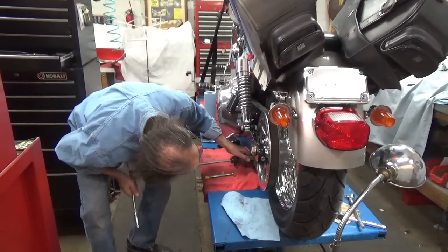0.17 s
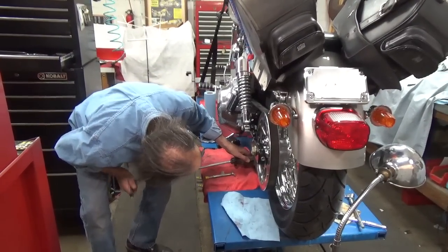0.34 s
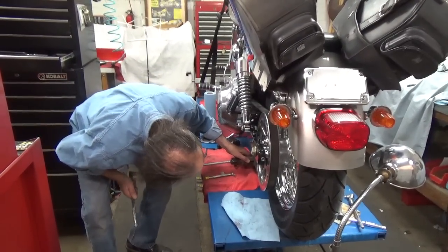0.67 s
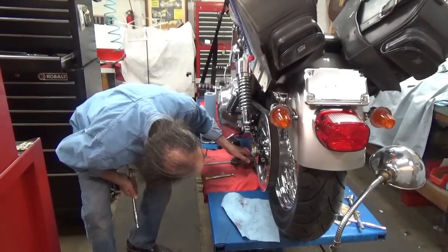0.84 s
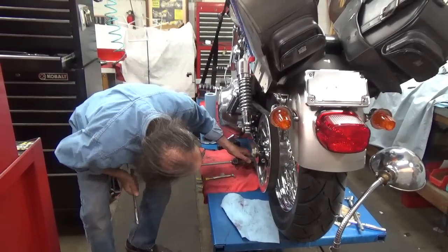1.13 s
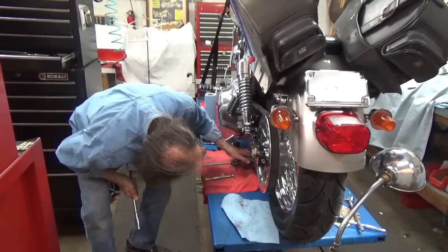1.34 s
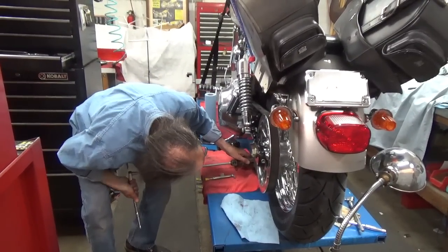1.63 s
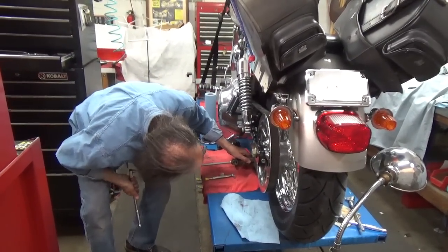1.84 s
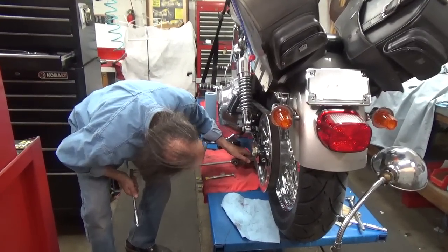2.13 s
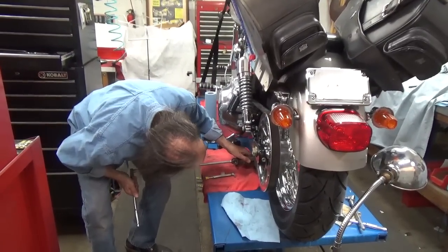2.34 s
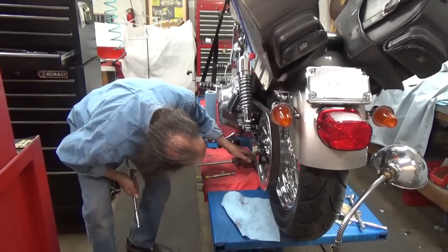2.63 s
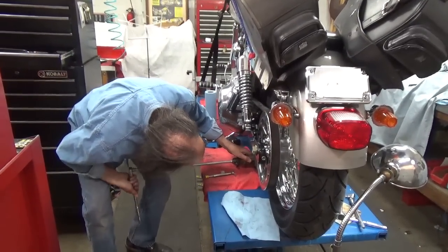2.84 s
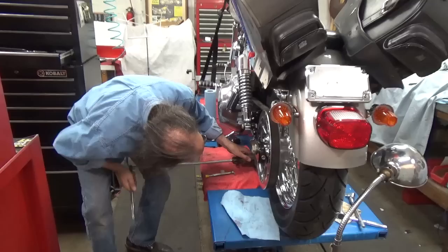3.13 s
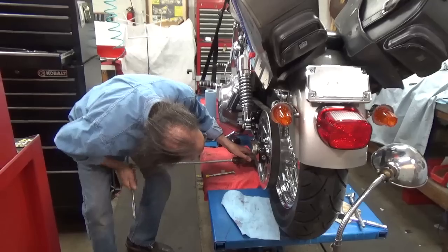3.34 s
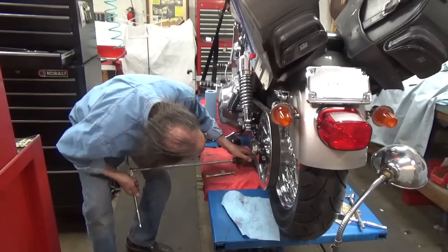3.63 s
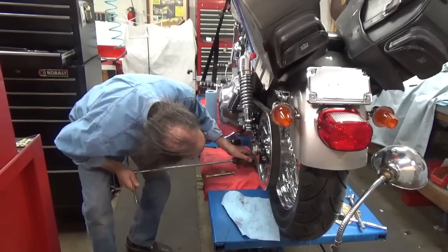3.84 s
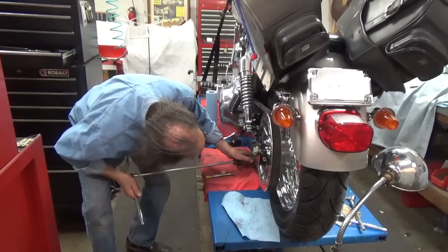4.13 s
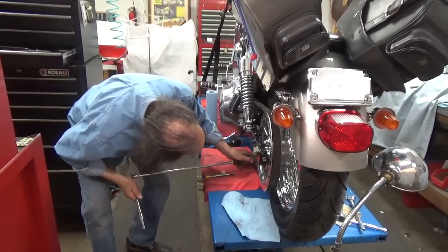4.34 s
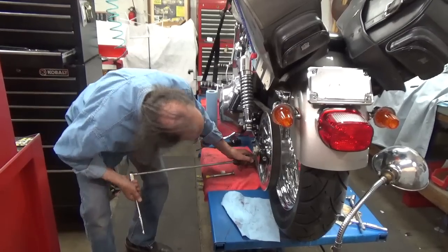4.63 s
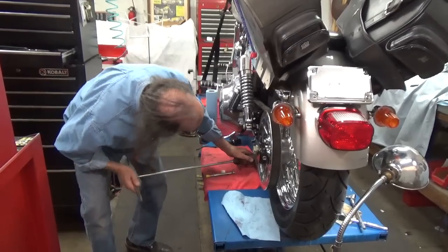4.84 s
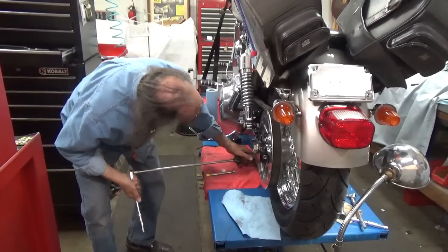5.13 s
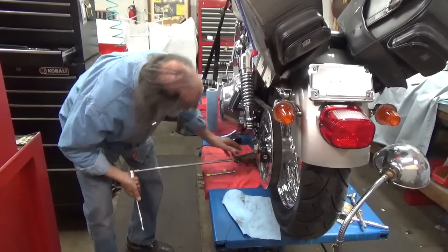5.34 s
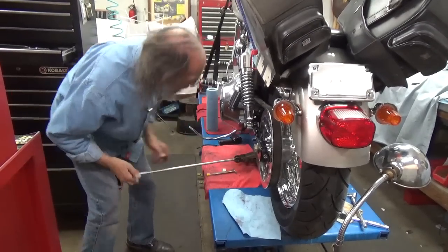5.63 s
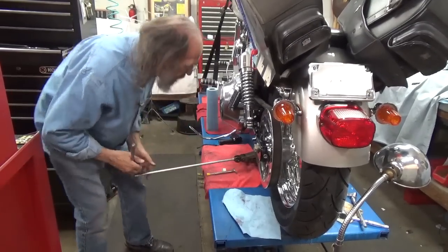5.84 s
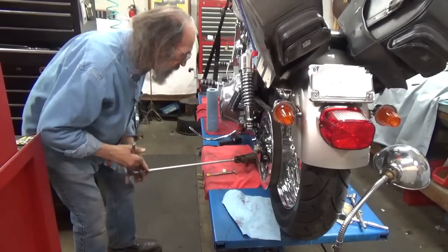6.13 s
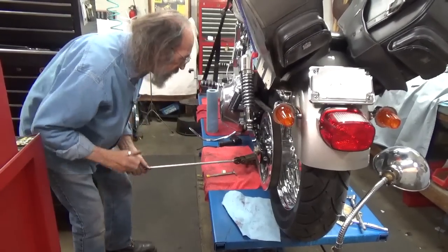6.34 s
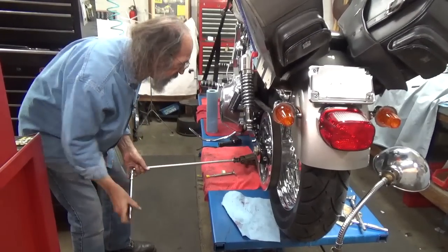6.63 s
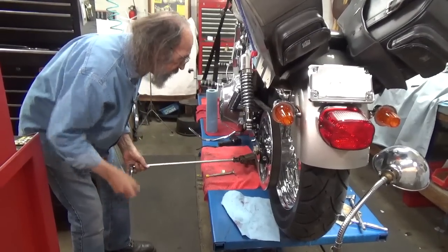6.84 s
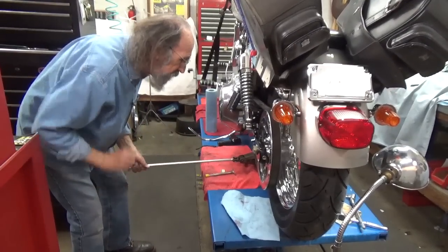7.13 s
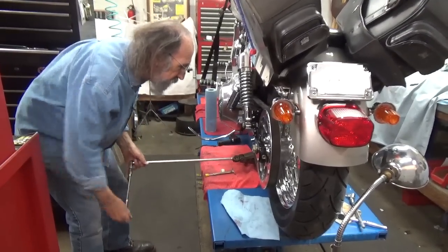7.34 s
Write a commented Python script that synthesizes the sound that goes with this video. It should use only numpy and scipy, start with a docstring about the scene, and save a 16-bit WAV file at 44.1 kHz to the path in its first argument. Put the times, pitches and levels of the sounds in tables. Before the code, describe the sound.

Quick runs of crisp metallic ratchet clicks, separated by small socket taps, cloth rustle and soft thuds through a bike frame in a small garage.

```python
"""A small garage, close to the rear wheel of a motorcycle on its lift, one camera microphone in mono.
A ratchet wrench on a long steel extension swings back, its pawl snapping over a few teeth as noise bursts
and decaying modes. The loose socket taps and grates through resonances; knocks ring lift, frame and panels.
Shaped noise makes the rubbing sleeves and hands, the quiet air and the short reverberation; sines add
a low hum and a thin tone."""
import sys
import numpy as np
from scipy import signal
from scipy.fft import rfft, irfft
from scipy.io import wavfile
from scipy.ndimage import uniform_filter1d

SR = 44100
rng = np.random.default_rng(int(sys.argv[2]) if len(sys.argv) > 2 else 0)


def store_pcm(level_fs):
    """Save levels as 16-bit WAV."""
    pcm = np.round(np.clip(level_fs, -1, 1) * 32767).astype(np.int16)
    wavfile.write(sys.argv[1], SR, np.atleast_2d(pcm).T)


N = 329868

# quiet garage air, spectrum: (frequency [Hz], relative density [dB])
AIR_SPECTRUM = [(15, -60), (25, -20.5), (59, 4.5), (165, -7.5), (197, -4.5), (223, -13), (362, -27.5),
                (907, -22), (979, -30), (1300, -25), (2160, -27.5), (9930, -29.5), (11000, -36),
                (14300, -70), (22000, -120)]
# low hum, peak before it wavers: (frequency [Hz], level [dB])
HUM_TONES = [(60, -77), (119, -79.5), (196, -74)]
# sleeves and hands rubbing: (time of full strength [s], length [s], level [dB])
RUBS = [(0.017, .2, -70), (1.073, 0.023, -48.5), (1.395, .04, -65), (1.903, .03, -55.5),
        (2.793, 0.025, -58), (3.004, .5, -60.5), (4.527, 0.51, -56.5), (5.571, 0.19, -38.5),
        (6.118, 0.042, -44), (6.24, 0.035, -49.5), (6.59, 0.098, -54), (6.942, .1, -38.5),
        (7.356, 0.071, -58)]
# rubbing cloth and skin, spectrum: (frequency [Hz], relative density [dB])
CLOTH_SPECTRUM = [(120, -32.5), (200, -9), (385, 0), (625, -8), (692, -7), (920, -10), (1000, -7.5),
                  (1800, -16.5), (2020, -16), (4920, -18.5), (11000, -23.5), (14300, -53.5), (22000, -120)]
# tool resonances stirred by grating and rubbing; rubbing leaves the gain aside:
# (frequency [Hz], width [Hz], gain [dB])
GRATE_RESONANCES = [(1650, 400, 7), (2500, 500, -2), (3270, 520, 2), (3460, 100, -14), (4700, 1000, -16),
                    (8400, 780, -18)]
# blows that reach bike and lift: (time [s], push time constant [s], thud level [dB], frame ring level [dB])
KNOCKS = [(0.005, 0.015, -53.5, -61), (0.29, 0.021, -49, -49.5), (0.497, 0.0039, -54, -53.5),
          (1.0848, 0.0011, -32.5, -28.5), (1.386, 0.0045, -38, -46), (1.945, 0.0038, -41.5, -37.5),
          (2.108, .012, -46, -48), (2.485, .016, -56.5, -63.5), (2.753, .017, -52, -62),
          (2.979, 0.0026, -66, -69), (3.233, 0.029, -40.5, -45.5), (3.351, .008, -36, -38),
          (3.989, 0.0091, -54, -67.5), (4.865, 0.011, -52.5, -46.5), (5.042, 0.0017, -47.5, -40.5),
          (5.44, 0.026, -54.5, -57.5), (5.788, 0.0037, -57, -43), (6.05, 0.0094, -61, -54.5),
          (6.375, 0.00095, -54, -50), (6.602, .0015, -46, -35), (7.183, 0.0023, -43, -31)]
# lift platform: (frequency [Hz], relative level [dB], t60 [s])
LIFT_MODES = [(61, -11, 0.38), (115.5, -1, 0.33), (154, -4.5, .3), (198.2, -1.5, 0.41), (233.3, -6.5, .28),
              (271, -4.5, 0.18)]
# thud of the lift, spectrum: (frequency [Hz], relative density [dB])
THUD_SPECTRUM = [(20, -34.5), (45, -15), (60, -8), (85, -7.5), (118, 0), (155, -6.5), (197, -3.5),
                 (260, -6), (340, -8), (600, -46)]
# bike frame: (frequency [Hz], relative level [dB], t60 [s])
FRAME_MODES = [(278.5, -7, 0.18), (309, -4.5, 0.27), (349.3, -4.5, 0.16), (361, -2.5, 0.21),
               (387, -1.5, 0.17), (490, -13.5, .22)]
# lift deck and panels: (frequency [Hz], relative level [dB], t60 [s])
PANEL_MODES = [(502, -8, 0.26), (680, -4.5, 0.28), (787, 1, 0.14), (1060, -14, .15), (1153, -9.5, 0.31),
               (1250, -8.5, 0.14), (1580, -14, 0.16), (2000, -14, 0.18)]
# clack of the panels, spectrum: (frequency [Hz], relative density [dB])
CLACK_SPECTRUM = [(250, -17.5), (420, -2), (510, -4), (620, -1), (790, -3), (1000, -8), (1250, -10),
                  (1900, -13), (3500, -33.5), (10000, -42)]
# back-swings of the handle, before each tooth's scatter: (first tooth [s], last tooth [s], teeth passed [count],
# first gap over middle gap [ratio], last gap over middle gap [ratio], snap level at mid-swing [dB],
# snap change over the swing [dB], snap pitch at mid-swing [Hz], shank ring level before SHANK_LIFT_DB [dB],
# shank pitch [Hz], frame ring level [dB])
SWINGS = [(0.1861, 0.3075, 5, .95, 1.07, -19.3, -1.5, 7800, -31.5, 4570, -58),
          (1.132, 1.1317, 1, 1, 1, -15.5, 0, 10630, -30, 4700, -54),
          (1.9394, 1.9852, 2, 1, 1, -17.7, -1, 9100, -30.5, 3695, -48),
          (3.1121, 3.2484, 8, 1.6, 1.43, -17.7, 1.5, 8840, -29.8, 3300, -60),
          (3.7073, 3.8487, 6, 1.69, 1.2, -19.3, 1.5, 6817, -30, 3520, -63),
          (4.7562, 4.8922, 6, .95, 1.37, -21.7, -8, 8400, -25.5, 2030, -53),
          (5.5207, 5.7748, 10, 1.45, 1.25, -23.4, 0.5, 7900, -30, 4315, -42.5),
          (6.8875, 7.0272, 5, 1.47, 1.12, -19.2, 2, 7250, -29.5, 4680, -42),
          (7.0977, 7.0977, 1, 1, 1, -21.5, 0, 8630, -28, 3393, -41.5)]
# pawl snapping down, spectrum: (frequency [Hz], relative density [dB])
SNAP_SPECTRUM = [(300, -13), (1200, -15.5), (3000, -13.5), (4500, -8.5), (6000, -2), (7500, -3.5),
                 (9000, -1.5), (11000, -7.5)]
# ringing shank and rattling parts, spectrum: (frequency [Hz], relative density [dB])
SHANK_SPECTRUM = [(300, -19.5), (1100, -14), (1600, -4.5), (2200, 1.5), (3400, -9), (4500, -4.5),
                  (7000, -5), (11000, -10)]
# steel extension held in the hand: (frequency [Hz], relative level [dB], t60 [s])
ROD_MODES = [(1437, -9, 0.053), (1680, -4, 0.042), (1974, -9, 0.08), (2840, -4.5, 0.027), (3290, -1, .03),
             (3620, 2.5, 0.041), (4250, -3.5, 0.013)]
# socket grating on the nut: (time [s], length [s], level [dB])
SCRAPES = [(.46, 0.05, -58.5), (0.59, 0.0084, -61), (1.019, 0.034, -58.5), (1.048, 0.066, -48),
           (1.08, 0.012, -29), (1.333, 0.026, -53), (1.827, 0.015, -63.5), (1.869, 0.12, -57),
           (2.767, 0.073, -53), (2.848, .03, -56.5), (2.953, .015, -60), (2.981, 0.017, -54),
           (6.371, .022, -50), (6.564, 0.011, -53.5)]
# socket and handle tapping in their play, level before the ping is added: (time [s], level [dB], pitch [Hz])
TAPS = [(0.4865, -55.5, 1510), (0.5036, -30, 5574), (1.1635, -32.5, 1633), (2.772, -49.5, 1732),
        (2.8106, -49.5, 1706), (3.3163, -36, 5885), (3.352, -37, 9180), (3.3626, -24.5, 2917),
        (3.4117, -42, 6630), (3.608, -51, 2710), (3.9343, -51, 2540), (4.368, -61, 2636),
        (4.9971, -45.5, 3480), (5.0291, -52, 3450), (5.044, -31.5, 5700), (5.047, -25.5, 2883),
        (5.1624, -59, 4170), (6.3806, -44.5, 10010), (6.8192, -50.5, 5340), (7.1798, -37.5, 5980),
        (7.1846, -25, 8370), (7.2524, -51.5, 6840)]
# loose socket: (frequency [Hz], width [Hz], gain [dB])
SOCKET_RESONANCES = [(1897, 900, -9.5), (3120, 630, 2), (5620, 250, 9), (7950, 3000, 6.5),
                     (9900, 850, -14.5)]
# sound leaving the tool in all directions, spectrum: (frequency [Hz], relative density [dB])
RADIATED_SPECTRUM = [(100, -21), (500, -1), (1100, -8), (1700, 1.5), (2600, -2), (3500, 0), (4800, -4),
                     (7500, 0), (11000, 3)]
# garage reverberation: (frequency [Hz], t60 [s])
ROOM_T60 = [(100, 0.99), (500, 0.29), (2000, .3), (6000, .25), (11000, 0.14)]

HIT = np.arange(SR // 2) / SR  # time since a blow, s
STRIKE_S = .012  # stretch over which steel sounds are levelled
AIR_DB = -67  # rms before its slow drift
THIN_HZ, THIN_DB, THIN_FULL_S, THIN_HOLD_S = 1440, -81, 1.7, 1.1  # a thin tone that comes and goes once
# a rub swells and dies away (each the time for 60 dB); the clothes never quite rest
RUB_ATTACK_S, RUB_T60_S, RUB_REST_DB = 0.29, .42, -73
# a longer push is softer on the panels: clack change for each doubling relative to a sharp blow
SHARP_PUSH_S, CLACK_DB_PER_DOUBLING = 0.0017, -3.0
# from SHIFT_S on, blows favour a higher frame mode and spare the panels
SHIFT_S = 3.3
EARLY_RING_HZ, EARLY_CLACK_DB = 303, 2.9  # clack against the mean of thud and frame ring
LATE_RING_HZ, LATE_CLACK_DB = 361, -4.5
TOOTH_PUSH_S, TOOTH_THUD_DB = 0.003, -15.5  # each tooth also jolts the bike; thud against the frame ring
# no two teeth are alike: spread of level, and of pitch (share)
TOOTH_SCATTER_DB, SNAP_SCATTER, SHANK_SCATTER = .5, 0.056, .04
# the snap sinks in pitch over a swing (share); the last tooth of a run of three or more is only just cleared
SNAP_SAG, LAST_TOOTH_DB = .12, -1.5
SHANK_LIFT_DB = 3.0  # lift of shank and extension together
# from LET_GO_S no hand steadies the extension: its low modes ring more and it clatters in the socket
LET_GO_S, FREE_ROD_DB, FREE_ROD_HZ, FREE_CLATTER_DB = 5.4, 7.5, 1450, -39.5
# harder and higher taps are brighter: treble of a middling tap and how it grows
TAP_TREBLE_DB, TAP_MID_DB, TAP_MID_HZ = -1.5, -42, 5500
TREBLE_DB_PER_OCTAVE, TREBLE_DB_PER_DB = 3, 0.22
TOP_HZ = 11000  # upper limit of the microphone track


def undb(db):
    """Decibels to gain."""
    return 10 ** (np.asarray(db) / 20)


def add(track, s, sound):
    """Mix a sound in from time s."""
    i = max(0, int(s * SR))
    track[i:i + len(sound)] += sound[:max(0, N - i)]


def level(x, db, span):
    """Scale a sound so that its first span seconds have the given rms."""
    return x * undb(db) / np.sqrt(np.mean(x[:int(span * SR)] ** 2) + 1e-20)


def freqs(x):
    """Frequency of each bin of a sound's spectrum, at least 1 Hz."""
    return np.maximum(np.arange(len(x) // 2 + 1) * SR / len(x), 1)


def along(points, hz):
    """Read (frequency, value) points on a log-frequency axis."""
    f, value = np.transpose(points)
    return np.interp(np.log(hz), np.log(f), value)


def colour(x, points, size=4096):
    """Minimum-phase filter with the given spectrum, so nothing sounds ahead of its blow."""
    cepstrum = irfft(np.log(undb(along(points, freqs(np.empty(size))))))
    # fold the cepstrum onto positive time
    cepstrum[1:size // 2] *= 2
    cepstrum[size // 2 + 1:] = 0
    impulse = irfft(np.exp(rfft(cepstrum)))
    return signal.fftconvolve(x, impulse)[:len(x)]


def resonate(x, hz, width_hz):
    """One resonance, gain 1 at its centre."""
    return signal.lfilter(*signal.iirpeak(hz, hz / width_hz, fs=SR), x)


def fade(t60):
    """Exponential decay over the length of a blow."""
    return np.exp(-np.log(1000) * HIT / t60)


def burst(t60):
    """Dense vibration dying away, as decaying noise."""
    return rng.standard_normal(len(HIT)) * fade(t60)


def chatter(t60, spike_db):
    """A run of tiny collisions of very unequal size, dying away."""
    sizes = np.repeat(rng.standard_normal(len(HIT) // 6), 6)
    return burst(t60) * undb(spike_db * sizes)


def ring(modes, scatter_db, detune):
    """Decaying modes; grip and contact point change their balance at each blow."""
    out = np.zeros(len(HIT))
    for hz, db, t60 in modes:
        balance, pitch, sign = rng.standard_normal(3)
        tone = np.sin(2 * np.pi * hz * (1 + detune * pitch) * HIT)
        out += np.sign(sign) * undb(db + scatter_db * balance) * fade(t60) * tone
    return out


def walk(rate):
    """Slow chance with a spread near 1, from twice-smoothed random steps."""
    k = int(SR / rate)
    steps = np.repeat(rng.standard_normal(N // k + 1), k)
    return uniform_filter1d(uniform_filter1d(steps, k), k)[:N] * np.sqrt(2)


def gesture(s, length, attack, t60):
    """Envelope that swells up to time s, holds for length and dies away."""
    t = np.arange(N) / SR - s
    before, after = np.maximum(-t, 0), np.maximum(t - length, 0)
    return np.exp(-np.log(1000) * (before / attack + after / t60))


def room_tone():
    """Quiet air as drifting noise, a low wavering hum and a thin tone that comes and goes."""
    air = level(colour(rng.standard_normal(N), AIR_SPECTRUM), AIR_DB, N / SR)
    air = air * undb(1.2 * walk(2.8))
    t = np.arange(N) / SR
    hum = sum(undb(db + 3 * walk(3.1)) * np.sin(2 * np.pi * hz * t) for hz, db in HUM_TONES)
    thin_swell = gesture(THIN_FULL_S, THIN_HOLD_S, attack=1.5, t60=4)
    thin = undb(THIN_DB) * thin_swell * np.sin(2 * np.pi * THIN_HZ * t)
    return air + hum + thin


def rubbing():
    """Cloth, skin and the loosely held extension slide, faintly stirring the tool's resonances."""
    power = undb(RUB_REST_DB) ** 2
    for s, length, db in RUBS:
        power = power + (undb(db) * gesture(s, length, RUB_ATTACK_S, RUB_T60_S)) ** 2
    # fibres catch unevenly, quickly and slowly
    catches = rng.standard_normal(N) * undb(2 * walk(900) + walk(60))
    cloth = colour(catches, CLOTH_SPECTRUM)
    tool = sum(undb(3 * walk(14)) * resonate(cloth, hz, width) for hz, width, _ in GRATE_RESONANCES)
    return level(cloth + undb(-7.5) * tool, 0, N / SR) * np.sqrt(power)


def teeth(start, end, count, slow_start, slow_end):
    """When the pawl falls in one swing: the hand speeds up and slows, so the gaps follow a parabola."""
    u = np.linspace(-1, 1, round(count) - 1)
    gaps = 1 + u * (slow_end - slow_start) / 2 + u ** 2 * ((slow_start + slow_end) / 2 - 1)
    return start + (end - start) * np.append(0, np.cumsum(gaps) / gaps.sum())


def blow(s, push, thud_db, frame_db):
    """One blow to the bike: the lift thuds, the frame rings and loose panels clack."""
    span = .08
    ring_hz, panel_db = (EARLY_RING_HZ, EARLY_CLACK_DB) if s < SHIFT_S else (LATE_RING_HZ, LATE_CLACK_DB)
    softness_db = CLACK_DB_PER_DOUBLING * np.log2(push / SHARP_PUSH_S)
    clack_db = (thud_db + frame_db) / 2 + panel_db + softness_db
    swell = 1 - np.exp(-HIT / push)

    platform = level(ring(LIFT_MODES, scatter_db=4, detune=0.02), 0, span)
    platform = platform + level(colour(burst(0.33), THUD_SPECTRUM), 0, span)
    # the bass builds up as the whole lift starts to move
    thud = platform * (1 - np.exp(-HIT / (push + 0.028)))

    # where the force enters decides which frame modes answer most
    favoured = [(hz, db + 8 * np.exp(-((hz - ring_hz) / 24) ** 2), t60) for hz, db, t60 in FRAME_MODES]
    frame = ring(favoured, scatter_db=3, detune=0.0026) * swell

    panels = level(ring(PANEL_MODES, scatter_db=2.5, detune=0.014), -4.5, span)
    clack = (panels + level(colour(burst(0.26), CLACK_SPECTRUM), -1.7, span)) * swell
    return level(thud, thud_db, span) + level(frame, frame_db, span) + level(clack, clack_db, span)


def knocks():
    """The bike is shaken when the load is taken up or let go, and a little by every tooth."""
    out = np.zeros(N)
    for s, push, thud_db, frame_db in KNOCKS:
        add(out, s, blow(s, push, thud_db, frame_db))
    for s, end, count, slow_start, slow_end, *_, frame_db in SWINGS:
        for at in teeth(s, end, count, slow_start, slow_end):
            add(out, at, blow(at, TOOTH_PUSH_S, frame_db + TOOTH_THUD_DB, frame_db))
    return out


def pawl(snap_db, snap_hz, shank_db, shank_hz, free):
    """One tooth: the pawl snaps down and sets the shank ringing; the loose parts rattle on."""
    contact = chatter(0.0045, spike_db=1.0) * (1 - np.exp(-HIT / 0.00049))
    contact = contact + undb(-15.0) * burst(0.022)
    snap = level(colour(contact, SNAP_SPECTRUM), 0, STRIKE_S)
    snap = snap + level(ring([(snap_hz, 0, .011)], 0, 0), -5.5, STRIKE_S)

    shank = level(colour(burst(0.045), SHANK_SPECTRUM), 0, STRIKE_S)
    shank = shank + level(ring([(shank_hz, 0, .028)], 0, 0), -4, STRIKE_S)
    modes = [(hz, db + free * FREE_ROD_DB * (FREE_ROD_HZ / hz) ** 4, t60) for hz, db, t60 in ROD_MODES]
    rod = level(ring(modes, scatter_db=6.5, detune=.004), -4, STRIKE_S)
    ringing = undb(SHANK_LIFT_DB) * level(shank + rod, shank_db, STRIKE_S)

    rattle = level(colour(chatter(0.074, spike_db=9.0), SHANK_SPECTRUM), snap_db - 31, STRIKE_S)
    out = level(snap, snap_db, STRIKE_S) + ringing + rattle
    if free:
        clatter = resonate(colour(chatter(.14, spike_db=5.5), SHANK_SPECTRUM), FREE_ROD_HZ, 500)
        out = out + level(clatter, FREE_CLATTER_DB, STRIKE_S)
    return out


def ratchet():
    """In each back-swing the pawl drags up one tooth after another and drops off it."""
    out = np.zeros(N)
    climb = HIT[:int(STRIKE_S * SR)]
    for s, end, count, slow_start, slow_end, snap_db, change_db, snap_hz, shank_db, shank_hz, _ in SWINGS:
        times = teeth(s, end, count, slow_start, slow_end)
        # -1/2 at the first tooth to 1/2 at the last
        progress = (np.arange(len(times)) - (len(times) - 1) / 2) / max(len(times) - 1, 1)
        for at, part in zip(times, progress):
            a, b, c = rng.standard_normal(3)
            last = len(times) > 2 and at == times[-1]
            force_db = TOOTH_SCATTER_DB * a + LAST_TOOTH_DB * last
            db = snap_db + change_db * part + force_db
            tooth_snap_hz = snap_hz * np.exp(SNAP_SCATTER * b - SNAP_SAG * part)
            tooth_shank_hz = shank_hz * np.exp(SHANK_SCATTER * c)
            # the drag grows until the pawl drops
            drag = rng.standard_normal(len(climb)) * np.exp(climb / 0.0012)
            add(out, at - STRIKE_S, level(colour(drag, SNAP_SPECTRUM), db - 25.0, STRIKE_S))
            add(out, at, pawl(db, tooth_snap_hz, shank_db + force_db, tooth_shank_hz, free=s > LET_GO_S))
    return out


def scrapes():
    """The socket shifts on the nut in quick sticks and slips."""
    out = np.zeros(N)
    for s, length, db in SCRAPES:
        swell = np.exp(-(HIT / length) ** 2) * (1 - np.exp(-HIT / 0.0038))
        slips = chatter(9, spike_db=7.0) * swell
        grate = sum(undb(gain_db) * resonate(slips, hz, width) for hz, width, gain_db in GRATE_RESONANCES)
        # small steel parts radiate little bass
        grate = colour(grate, [(500, -15.5), (1700, 0.5), (3000, 0)])
        add(out, s, level(grate, db, length))
    return out


def socket():
    """Short steel-on-steel taps, damped by the hand; each contact point favours one pitch."""
    out = np.zeros(N)
    for s, db, pitch_hz in TAPS:
        treble_db = TAP_TREBLE_DB + TREBLE_DB_PER_OCTAVE * np.log2(pitch_hz / TAP_MID_HZ)
        treble_db = treble_db + TREBLE_DB_PER_DB * (db - TAP_MID_DB)
        contact = chatter(0.011, spike_db=4.0) + undb(-11) * burst(0.028)
        tap = undb(-16.5) * contact
        for hz, width, gain_db in SOCKET_RESONANCES:
            tap = tap + undb(gain_db) * resonate(contact, hz, width)
        tap = colour(tap, [(700, -6.5), (2000, 6), (4000, 2.5), (8000, treble_db)])
        ping = ring([(pitch_hz, 0, .013)], 0, 0)
        add(out, s, level(tap, db, STRIKE_S) + undb(-4.5) * level(ping, db, STRIKE_S))
    return out


def radiate(x):
    """Each face of the tool rings differently, so the walls receive the same bursts with an evener colour."""
    spread = colour(np.abs(x) * rng.standard_normal(N), RADIATED_SPECTRUM)
    return spread * np.std(x) / np.std(spread) + .5 * x


def reverb(x, wet_db, onset):
    """Diffuse reflections from cluttered walls, as noise whose bands die away, the treble first."""
    noise = rng.standard_normal(len(HIT))
    spectrum, hz = rfft(noise), freqs(noise)
    centres, t60s = np.transpose(ROOM_T60)
    tail = np.zeros(len(HIT))
    # overlapping bands, each with its own decay
    for share, t60 in zip(np.eye(len(t60s)), t60s):
        band = spectrum * np.interp(np.log(hz), np.log(centres), share)
        tail += irfft(band, len(HIT)) * fade(t60)
    tail = tail * (1 - np.exp(-(HIT / onset) ** 2))
    return undb(wet_db) * signal.fftconvolve(x, tail / np.linalg.norm(tail))[:N]


def scene():
    """Wrench and bike in the garage, the same in both channels."""
    body = knocks()
    steel = ratchet() + scrapes() + socket()
    room = reverb(radiate(steel), wet_db=-18.5, onset=0.011) + reverb(body, wet_db=-23, onset=0.022)
    mono = room_tone() + rubbing() + body + steel + room
    return np.array([mono, mono])


def record(dry):
    """The camera microphone softly rounds the highest peaks and cuts the top."""
    ceiling = 2
    rounded = ceiling * np.tanh(dry / ceiling)
    return signal.sosfilt(signal.ellip(8, .3, 70, TOP_HZ, fs=SR, output="sos"), rounded)


dry = scene()
out = record(dry)
store_pcm(out)
```